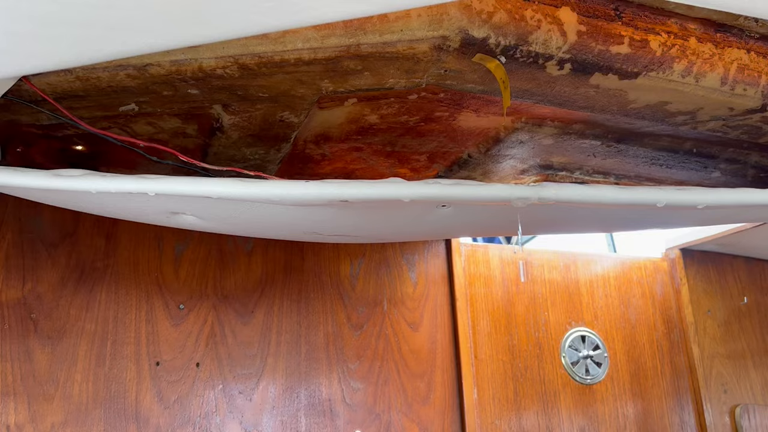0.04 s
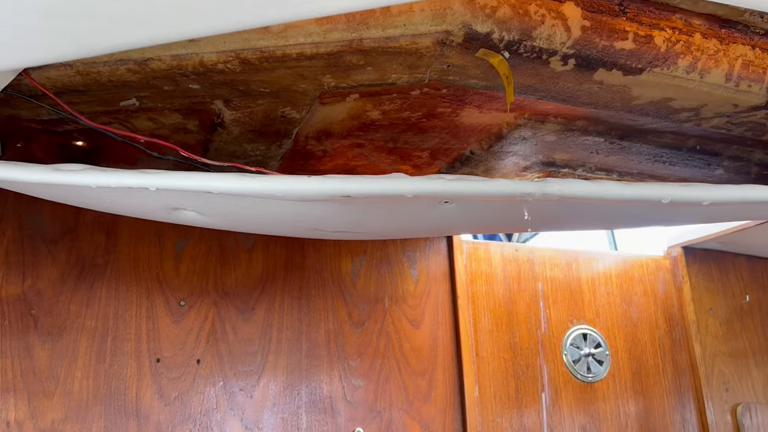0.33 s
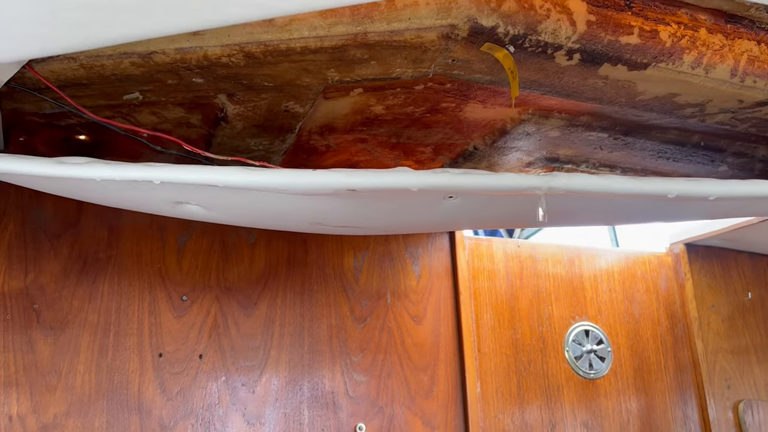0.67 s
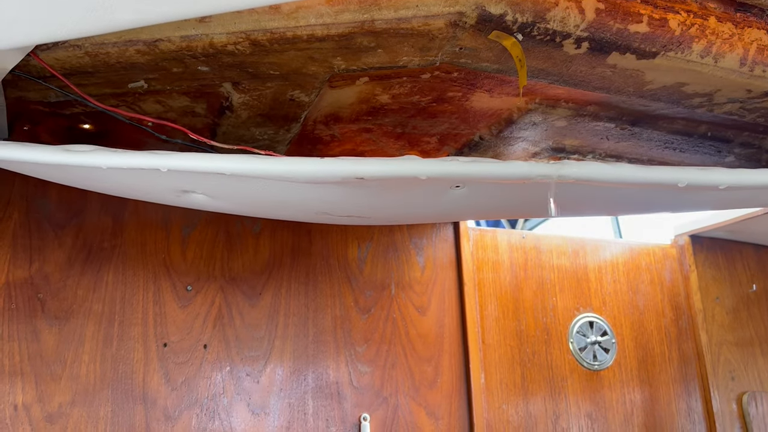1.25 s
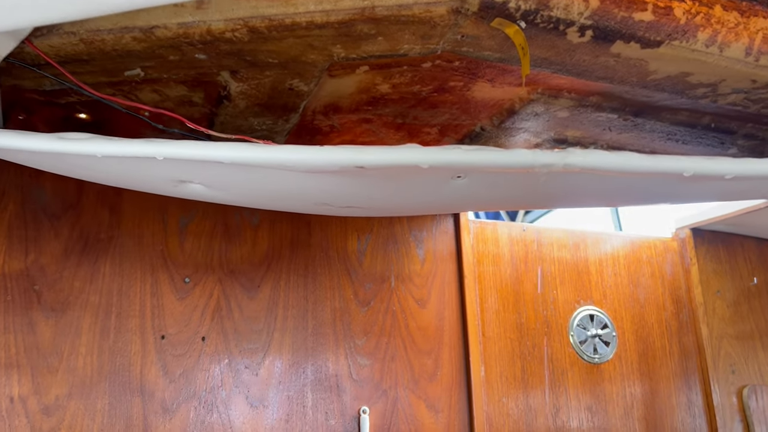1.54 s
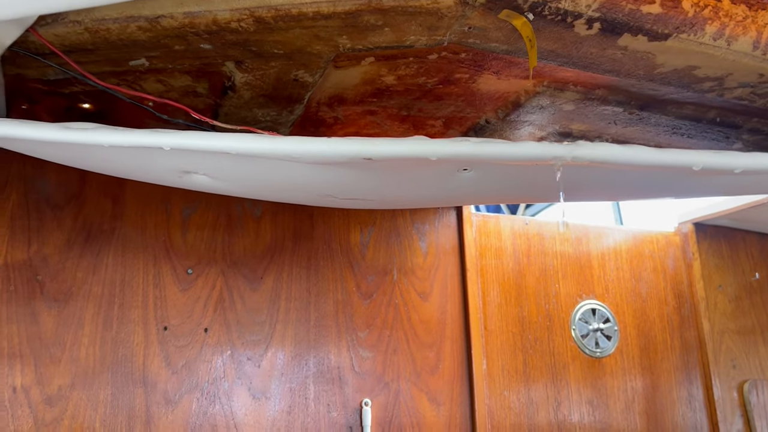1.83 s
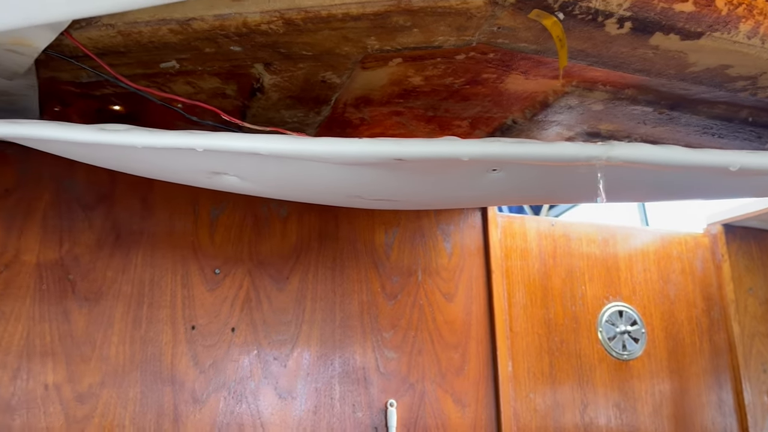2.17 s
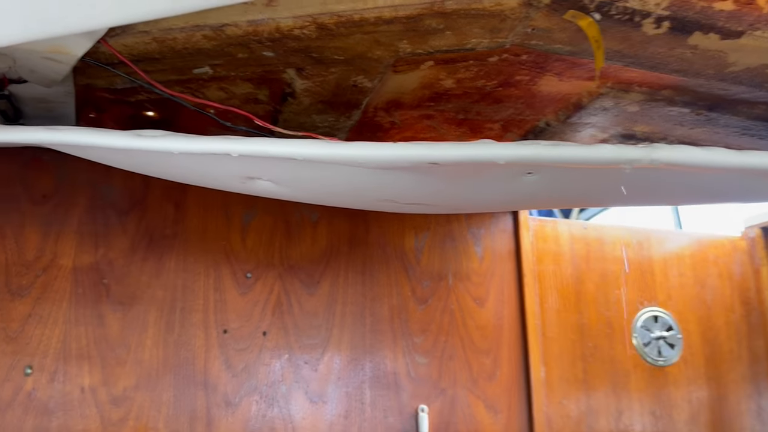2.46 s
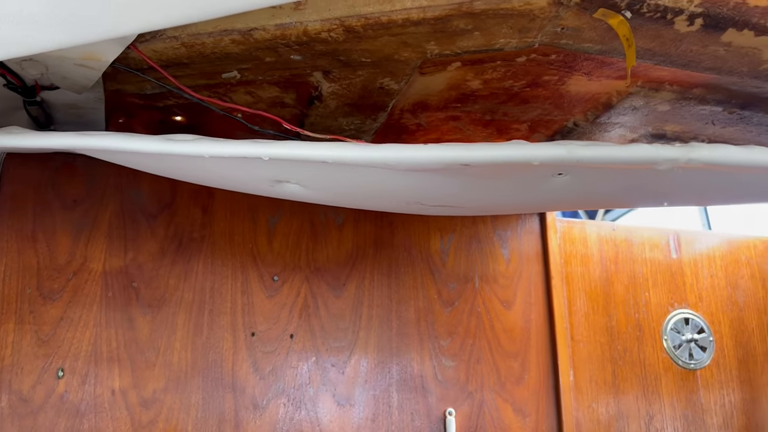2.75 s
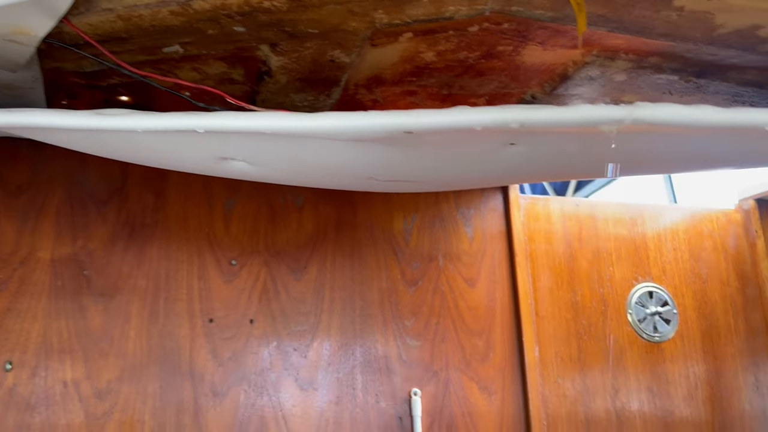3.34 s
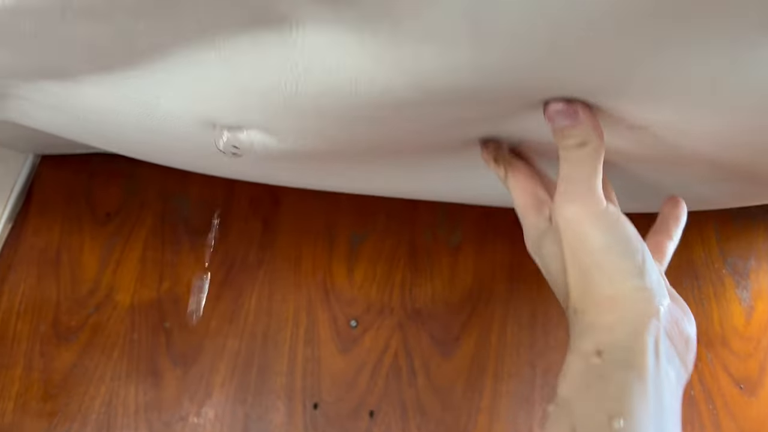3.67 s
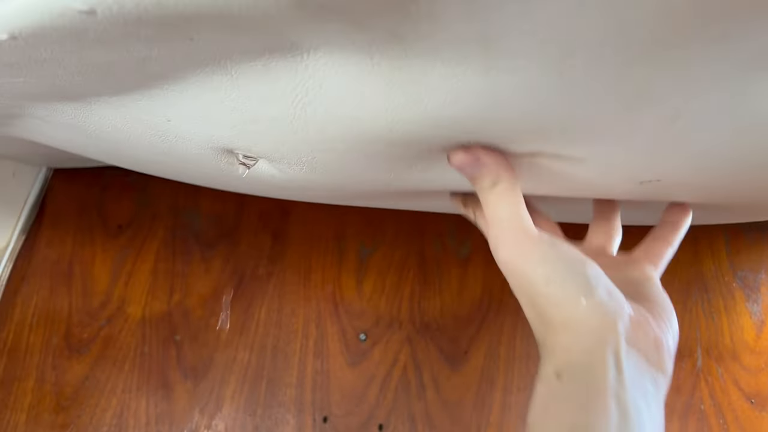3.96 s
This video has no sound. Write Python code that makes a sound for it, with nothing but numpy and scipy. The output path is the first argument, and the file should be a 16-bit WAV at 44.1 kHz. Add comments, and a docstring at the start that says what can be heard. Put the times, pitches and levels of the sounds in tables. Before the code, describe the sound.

Water drips from a sagging ceiling onto a hard, wet panel in a small cabin, with close, irregular smacks, splats and plinks over a low rumble. Near the end comes one dry snap, then a hand rubs the lining.

```python
"""Water drips from a sagging ceiling lining onto a hard, wet panel in a small wooden cabin.
Big drops ring the panel's modes and smack as they spread; sharp splats throw spray; trapped
bubbles plink. Water trickles in the lining, with dull knocks and gurgles, over a low rumble.
Near the end comes one dry snap, then a hand pushes and rubs at the lining."""
import sys
import numpy as np
from scipy import signal
from scipy.fft import rfft, irfft
from scipy.io import wavfile

SR = 44100
rng = np.random.default_rng(int(sys.argv[2]) if len(sys.argv) > 2 else 0)


def to_wav(sig):
    """Store sig (one row per channel, or 1-D mono) as 16-bit WAV at the path in sys.argv[1].

    Samples outside -1..1 are clipped; the rate is SR.
    """
    pcm = np.clip(np.atleast_2d(sig), -1, 1) * 32767
    pcm = np.round(pcm).astype(np.int16)
    wavfile.write(sys.argv[1], SR, pcm.T)  # frames by channels


N = 176400
T = np.arange(SR // 4) / SR  # time within one event, s
BANDS_HZ = 25 * 2 ** (np.arange(29) / 3)


def from_db(db):
    """Decibels to gain."""
    return 10 ** (np.asarray(db) / 20)


def at_hz(points, hz=BANDS_HZ):
    """Interpolate (Hz, value) points on a log-frequency axis."""
    freqs, values = np.transpose(points)
    return np.interp(np.log(hz), np.log(freqs), values)


def rise(attack_s):
    """Smooth onset from 0 to 1."""
    return 1 - np.exp(-(T / attack_s) ** 2)


def fall(t60_s):
    """Exponential decay, 60 dB in t60_s."""
    return np.exp(-np.log(1000) * T / np.maximum(t60_s, 1e-4))


def add(out, start_s, sound):
    """Mix a sound in at start_s."""
    i = int(np.clip(start_s * SR, 0, N - 1))
    out[..., i:i + sound.shape[-1]] += sound[..., :N - i]


def jitter(length, grain_s):
    """Straight lines between Gaussian values, one per grain."""
    t = np.arange(length) / SR
    steps = rng.standard_normal(length // 8)
    return np.interp(t / max(grain_s, 8 / SR), np.arange(len(steps)), steps)


def blip(hz, cycles):
    """Tiny ring: swells over one cycle, falls 60 dB in the given cycles."""
    return np.sin(2 * np.pi * hz * T) * fall(cycles / hz) * rise(1 / hz)


def in_cabin(x, room_db, t60_s, first_echo_s):
    """Direct sound plus dense stereo reflections from close walls."""
    echoes = rng.standard_normal((2, len(T))) * fall(t60_s) * (T > first_echo_s)
    echoes /= np.sqrt(np.sum(echoes ** 2, axis=1, keepdims=True))
    return x + from_db(room_db) * signal.fftconvolve(x[None], echoes, axes=1)[:, :N]


# Each row: frequency in Hz, left-right correlation.
STEREO_CORRELATION = [(50,0.99), (250,0.78), (1000,0.26), (3000,0.13), (9000,0.41)]

def noise_bands():
    """Third-octave stereo noise at unit rms: bands x channels x samples."""
    white, bands = rng.standard_normal((2, 2, N + len(T))), []
    for k, hz in enumerate(BANDS_HZ):
        sos = signal.butter(3, [hz / 2 ** (1 / 6), hz * 2 ** (1 / 6)], "band", fs=SR, output="sos")
        mid, side = signal.sosfilt(sos, white[k % 2])
        alike = np.clip(at_hz(STEREO_CORRELATION, hz), 0, 1)
        pair = np.sqrt(1 + alike) * mid + np.sqrt(1 - alike) * np.array([side, -side])
        bands.append((pair / pair.std()).astype(np.float32))
    return np.array(bands)


def spattering(bands, depth_db=4, grain_s=0.0018):
    """A splash breaks into tiny impacts: fine grains in the treble, coarse in the mids."""
    grains = [from_db(depth_db * jitter(bands.shape[2], grain_s * k)) for k in (1, 2)]
    fine, coarse = [(g / np.sqrt(np.mean(g ** 2))).astype(np.float32) for g in grains]
    return np.array([band * (fine if hz > 3500 else coarse if hz > 900 else 1)
                     for band, hz in zip(bands, BANDS_HZ)])


def coloured(bands, spectrum):
    """Continuous stereo noise with the given band levels."""
    return np.einsum("b,bct->ct", from_db(at_hz(spectrum)).astype(np.float32), bands[:, :, :N])


# Each row: frequency in Hz, cabin T60 in seconds.
CABIN_DECAY = [(100,0.39), (600,0.16), (15000,0.088)]

def bursts(bands, events, levels_db, attack_s, t60_s, tail_db):
    """Noise impacts with the cabin's tail. Per event: a row led by its start, and a level per band."""
    tail = from_db(tail_db) * fall(at_hz(CABIN_DECAY)[:, None])
    shape = np.hypot(fall(t60_s), tail) * rise(attack_s)
    out = np.zeros((2, N))
    for (start_s, *_), db in zip(events, levels_db):
        i = int(start_s * SR)
        envelopes = (from_db(db)[:, None] * shape).astype(np.float32)
        add(out, start_s, np.einsum("bt,bct->ct", envelopes, bands[:, :, i:i + len(T)]))
    return out


# Each row: frequency in Hz, band level in dB.
RUMBLE_SPECTRUM = [(25,-90), (45,-59.5), (70,-64.5), (110,-63), (160,-73), (240,-67), (420,-83), (630,-70),
                   (1000,-73.5), (2300,-82.5), (3300,-92.5), (11000,-97.5), (16000,-106)]

def rumble(bands):
    """Steady low rumble with a faint hiss."""
    return coloured(bands, RUMBLE_SPECTRUM)


def trickle(rate_per_s=33, low_hz=408, high_hz=2300, level_db=-58, spread_db=6.5):
    """Water creeps in the lining: a soft, random patter of low bubbles."""
    out = np.zeros(N)
    starts_s = np.cumsum(rng.exponential(1, size=400)) / rate_per_s
    for start_s, pitch, size in zip(starts_s, rng.random(400), rng.standard_normal(400)):
        if start_s < N / SR:
            hz = low_hz * (high_hz / low_hz) ** pitch
            gain = from_db(level_db + spread_db * min(size, 2)) * np.sqrt(low_hz / hz)
            add(out, start_s, gain * blip(hz, cycles=6.8))
    return in_cabin(out, room_db=5.5, t60_s=0.054, first_echo_s=0)


def drive_db(knock, boom, slap, hz):
    """How hard a drop drives the panel at each frequency."""
    return at_hz([(300, boom + 3.5), (560, knock), (950, knock), (1600, slap + 2.5)], hz)


# Each row: start in seconds, then knock (mid), boom (low) and slap (high) drive in dB.
BIG_DROPS = [(0.13, -39, -41, -50), (0.407, -41.5, -40, -63), (0.435, -45, -46, -52),
             (0.631, -38.5, -43, -54), (0.843, -49.5, -52, -69), (1.104, -41, -45.5, -62),
             (1.308, -41, -48.5, -51), (1.462, -43, -46, -58), (1.499, -49, -59, -64),
             (1.651, -45.5, -46.5, -71), (1.812, -51, -55.5, -76), (2.026, -40, -39, -55.5),
             (2.217, -34.5, -38.5, -46.5), (2.572, -45, -44.5, -59.5), (2.798, -48, -46.5, -59),
             (2.95, -40, -42, -54.5), (3.102, -38, -38.5, -59), (3.307, -47.5, -61, -74),
             (3.359, -42.5, -46.5, -66)]
# Each row: frequency in Hz, gain in dB, T60 in seconds.
PANEL_MODES = [(218,-7.5,0.067), (250.3,-3,0.075), (301,-7,0.11), (596.3,1,0.12), (699.2,-7,0.084),
               (947.7,-6,0.093), (1576,5,0.039), (1760,-17,0.1), (2200,12.5,0.024), (2300,5.5,0.034)]

def panel(gain_db=0.5, scatter_db=2.5, detune=0.018, rise_cycles=0.9):
    """Big drops ring the panel; landing spot and water film shift each mode's level and pitch."""
    out = np.zeros(N)
    spots = np.clip(rng.standard_normal((len(BIG_DROPS), len(PANEL_MODES), 2)), -2, 2)
    for (start_s, *drive), spot in zip(BIG_DROPS, spots):
        for k, ((hz, mode_db, t60_s), (louder, higher)) in enumerate(zip(PANEL_MODES, spot)):
            tone = np.sin(2 * np.pi * hz * (1 + detune * higher) * T)
            ring = (-1) ** k * tone * fall(t60_s) * rise(rise_cycles / hz)
            db = gain_db + mode_db + drive_db(*drive, hz) + scatter_db * louder
            lag_s = 0.0035 * 250 / hz  # low bending waves arrive late
            add(out, start_s + lag_s, from_db(db) * ring)
    return in_cabin(out, room_db=-11, t60_s=0.09, first_echo_s=0.004)


# Each row: frequency in Hz, band gain in dB.
SMACK_SPECTRUM = [(200,-27), (450,-17.5), (800,-3), (2200,-11.5), (3000,-10), (4500,-4)]

def smacks(bands, gain_db=-11):
    """The wet smack of each big drop as it spreads."""
    levels_db = [at_hz(SMACK_SPECTRUM) + drive_db(*drive, BANDS_HZ) + gain_db for _, *drive in BIG_DROPS]
    return bursts(bands, BIG_DROPS, levels_db, attack_s=0.00054, t60_s=0.062, tail_db=-6.5)


# Each row: start in seconds, then top, treble and mid level in dB.
SPLAT_HITS = [(0.1304, -43.5, -62, -36.5), (0.159, -35.5, -39.5, -42), (0.1765, -40, -54, -45),
              (0.405, -44.5, -53, -34), (0.4357, -41.5, -48, -44.5), (0.631, -44, -44.5, -42),
              (0.642, -30.5, -36, -36), (0.7283, -43, -52, -54), (0.748, -36.5, -48, -43),
              (1.1075, -34, -49.5, -36), (1.1866, -31, -49, -43), (1.2393, -41.5, -41, -39.5),
              (1.3071, -36.5, -42.5, -35.5), (1.3335, -46, -45.5, -55), (1.3674, -41, -49.5, -40),
              (1.3965, -83, -56, -38.5), (1.4631, -57, -47.5, -33), (1.6574, -36, -57, -40.5),
              (1.682, -32, -48, -30.5), (1.8084, -31, -50.5, -41), (1.8512, -49.5, -80, -40),
              (1.884, -59, -64, -34), (2.0262, -37.5, -50, -35), (2.0918, -35, -50, -44),
              (2.2164, -35, -80, -24.5), (2.301, -31.5, -47.5, -33.5), (2.358, -39, -92, -82),
              (2.574, -35, -60, -45), (2.5938, -26, -52.5, -36), (2.7094, -31, -58, -36),
              (2.7945, -44, -49, -27), (2.8517, -39.5, -55.5, -37), (2.9477, -49, -66, -33.5),
              (3.0093, -41.5, -58, -34.5), (3.101, -35, -47.5, -30.5), (3.2073, -41.5, -54, -53),
              (3.358, -49.5, -56, -36.5), (3.3785, -41, -63, -35.5), (3.394, -61, -66, -48)]
# Each row: frequency in Hz, band gain in dB.
SPLAT_SPECTRUM = [(400,-25.5), (1000,-23.5), (1700,-7.5), (2300,-10), (3300,-21.5), (5000,6), (6800,-12.5),
                  (9000,-2.5), (12000,0), (15500,-6.5)]

def splats(bands, scatter_db=3):
    """Small drops burst sharply on the wet surface, each with its own colour."""
    hits_db = [at_hz([(2800, mid), (4300, treble), (5800, treble), (7500, top)])
               for _, top, treble, mid in SPLAT_HITS]
    levels_db = at_hz(SPLAT_SPECTRUM) + np.array(hits_db)
    levels_db += scatter_db * rng.standard_normal(levels_db.shape)
    return bursts(bands, SPLAT_HITS, levels_db, attack_s=0.0015, t60_s=0.017, tail_db=-16.5)


def spray(droplets=24, low_hz=1920, high_hz=15300, spread_db=22, fade_db_per_s=95):
    """Each splat throws tiny droplets that land soon after, each with its own pitch."""
    out = np.zeros(N)
    strengths_db = np.array([max(top, treble) for _, top, treble, _ in SPLAT_HITS])
    showers_db = -43 + 0.3 * (strengths_db - np.median(strengths_db))
    for (start_s, *_), shower_db in zip(SPLAT_HITS, showers_db):
        delays_s = 0.02 * rng.gamma(2, 1, size=droplets)
        for delay_s, pitch, softness in zip(delays_s, rng.random(droplets), rng.random(droplets)):
            hz = low_hz * (high_hz / low_hz) ** np.sqrt(pitch)
            db = shower_db - spread_db * softness - fade_db_per_s * delay_s
            add(out, start_s + delay_s, from_db(db) * blip(hz, cycles=10.4))
    return in_cabin(out, room_db=6, t60_s=0.062, first_echo_s=0)


# Each row: start in seconds, starting pitch in Hz, level in dB, cycles to fall 60 dB.
TRAPPED_BUBBLES = [(.207,2750,-32.5,34), (.299,2660,-54,67), (.517,480,-53,39), (0.688,2370,-38.5,31),
                   (0.731,4460,-41.5,83), (0.797,2880,-40.5,29), (0.819,5300,-40,58), (.936,527,-32,18),
                   (0.98,3370,-61,95), (1.144,2100,-34,23), (1.237,5700,-35,100), (1.29,430,-36.5,1.9),
                   (1.398,580,-26,9.3), (1.559,2250,-49,45), (1.947,4720,-33,50), (1.947,5830,-40,85),
                   (2.615,2440,-43.5,50), (2.713,2360,-31,32), (2.868,527,-34.5,9.7), (3.157,740,-34.5,74),
                   (3.185,2160,-33,67), (3.223,534,-38.5,21), (3.411,554,-37.5,14)]

def bubbles(gain_db=-0.5, glide=0.089, wobble=0.027):
    """Trapped air rings, wobbling and rising a little in pitch."""
    out = np.zeros(N)
    for start_s, hz, db, cycles in TRAPPED_BUBBLES:
        life_s = cycles / hz
        pitch_hz = hz * (1 + glide * np.minimum(T / life_s, 1) + wobble * jitter(len(T), 2 / hz))
        tone = np.sin(2 * np.pi * np.cumsum(pitch_hz) / SR)
        add(out, start_s, from_db(db + gain_db) * tone * fall(life_s) * rise(0.039 * life_s))
    return in_cabin(out, room_db=-0.5, t60_s=0.055, first_echo_s=0.0047)


def plops(bands, gain_db=-11, skirt_db_per_octave=7):
    """The wet impact that traps each bubble: a broad tick around its pitch."""
    levels_db = [db + gain_db - skirt_db_per_octave * np.abs(np.log2(BANDS_HZ / hz))
                 for _, hz, db, _ in TRAPPED_BUBBLES]
    return bursts(bands, TRAPPED_BUBBLES, levels_db, attack_s=0.0014, t60_s=0.021, tail_db=-16.5)


# Each row: start in seconds, then bass, low and mid level in dB.
BUMP_HITS = [(1.262, -41, -70, -52.5), (1.859, -36.5, -45.5, -66), (1.883, -44.5, -49, -51.5),
             (2.247, -38, -36.5, -63), (2.41, -41, -44.5, -52.5), (2.489, -44, -49, -55.5),
             (3.505, -42.5, -31.5, -45.5), (3.528, -41.5, -38.5, -83), (3.553, -46, -49, -57.5),
             (3.749, -51, -34, -66), (3.782, -62, -72, -46), (3.812, -53, -76, -61),
             (3.945, -53, -50, -47.5)]
# Each row: frequency in Hz, band gain in dB.
BUMP_SPECTRUM = [(40,-30), (70,-2.5), (170,-6), (250,-4.5), (450,-8.5), (650,5), (1300,-7.5), (2100,-14),
                 (3600,-43)]

def bumps(bands):
    """Dull knocks and gurgles; from 3.5 s, the hand pushing at the lining."""
    levels_db = [at_hz(BUMP_SPECTRUM) + at_hz([(130, bass), (200, low), (430, low), (620, mid)])
                 for _, bass, low, mid in BUMP_HITS]
    return bursts(bands, BUMP_HITS, levels_db, attack_s=0.001, t60_s=0.061, tail_db=-11)


# Each row: frequency in Hz, band level in dB.
SNAP_SPECTRUM = [(600,-50), (1800,-31), (3500,-50), (12000,-36)]

def snap(bands, start_s=3.43):
    """One dry, close snap that stops dead."""
    return bursts(bands, [(start_s,)], [at_hz(SNAP_SPECTRUM)], attack_s=0.0012, t60_s=0.019, tail_db=-45)


# Each row: time in seconds, gain in dB.
RUB_ENVELOPE = [(3.47,-43), (3.499,18.5), (3.55,-18.5), (3.67,-28), (3.72,-4), (3.80,8), (3.95,-25)]
# Each row, in both: frequency in Hz, band level in dB.
RUB_SPECTRUM = [(300,-74.5), (1000,-72), (2000,-85), (3500,-78.5), (9000,-83.5), (15000,-79)]
SCUFF_SPECTRUM = [(250,-82), (600,-61.5), (1900,-72.5), (3200,-93)]

def rubbing(bands, slip_db=5.5, slip_s=0.004, scuff_start_s=3.924):
    """Fingers stick and slip on the lining: a light rub, then a duller scuff as they press harder."""
    t = np.arange(N) / SR
    slips = from_db(slip_db * jitter(N, slip_s))
    rub_db = np.interp(t, *np.transpose(RUB_ENVELOPE), left=-np.inf)
    rub = from_db(rub_db) * coloured(bands, RUB_SPECTRUM)
    scuff = np.clip((t - scuff_start_s) / slip_s, 0, 1) * coloured(bands, SCUFF_SPECTRUM)
    return (rub + scuff) * slips / np.sqrt(np.mean(slips ** 2))


# Each row: frequency in Hz, left minus right in dB.
STEREO_BALANCE = [(150,1.5), (2200,3), (8000,1)]

def placed(pair, left_lag_s=21e-6):
    """Stereo position: slightly louder on the left, earlier on the right."""
    left, right = rfft(pair)
    hz = np.fft.rfftfreq(N, 1 / SR)
    lean = from_db(at_hz(STEREO_BALANCE, hz + 1) / 2)
    delay = np.exp(-2j * np.pi * hz * left_lag_s)
    return irfft(np.array([left * lean * delay, right / lean]), N)


def scene():
    """Water and knocks placed in stereo, plus rubbing and rumble."""
    bands = noise_bands()
    grainy = spattering(bands)
    impacts = panel() + smacks(grainy) + splats(grainy) + snap(grainy) + spray()
    gurgles = trickle() + bubbles() + plops(grainy) + bumps(grainy)
    return placed(impacts + gurgles) + rubbing(grainy) + rumble(bands)


# Each row: notch frequency in Hz, Q.
MIC_NOTCHES = [(10200,6.2), (13900,6.7)]

def record(dry, open_s=0.062, fade_s=0.01, cutoff_hz=16500):
    """Microphone: opens after a moment; two treble notches and a steep low-pass."""
    x = dry * np.clip((np.arange(N) / SR - open_s) / fade_s, 0.01, 1)
    for hz, q in MIC_NOTCHES:
        x = signal.lfilter(*signal.iirnotch(hz, q, fs=SR), x)
    return signal.sosfilt(signal.ellip(10, 0.3, 80, cutoff_hz, fs=SR, output="sos"), x)


dry = scene()
out = record(dry)
to_wav(out)
```